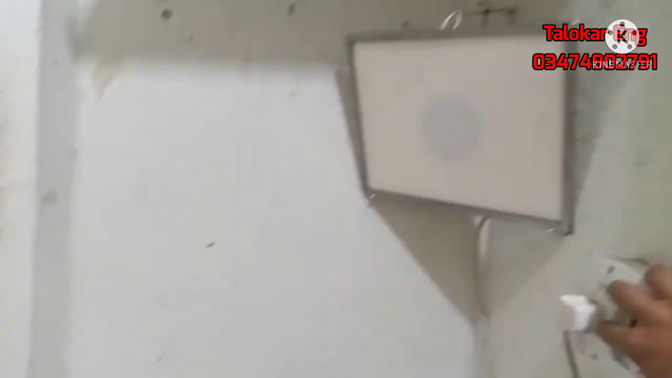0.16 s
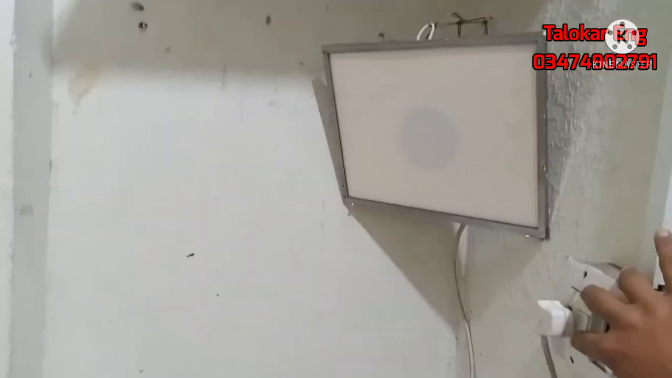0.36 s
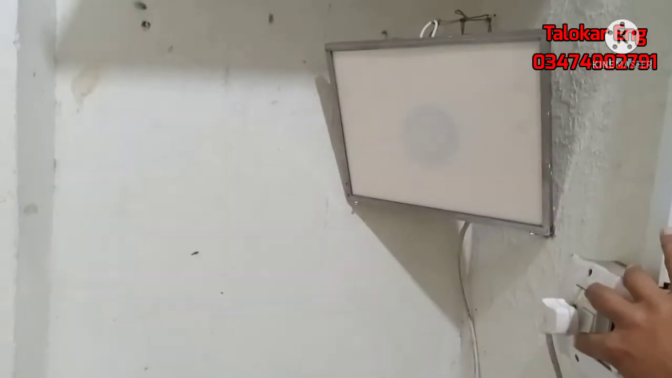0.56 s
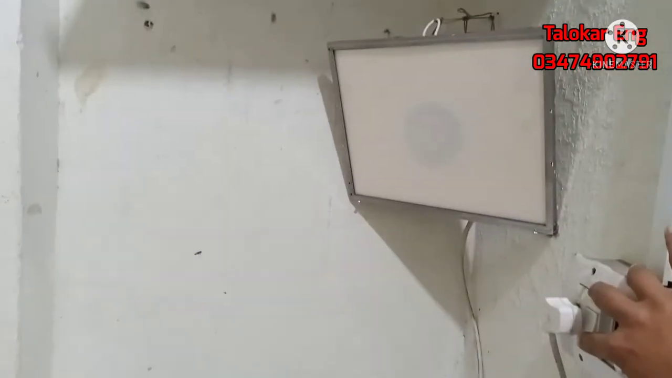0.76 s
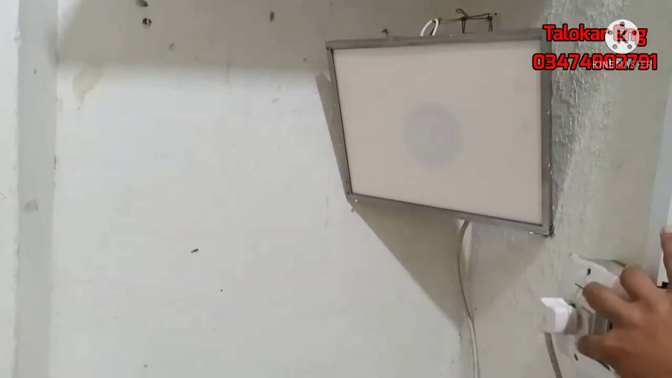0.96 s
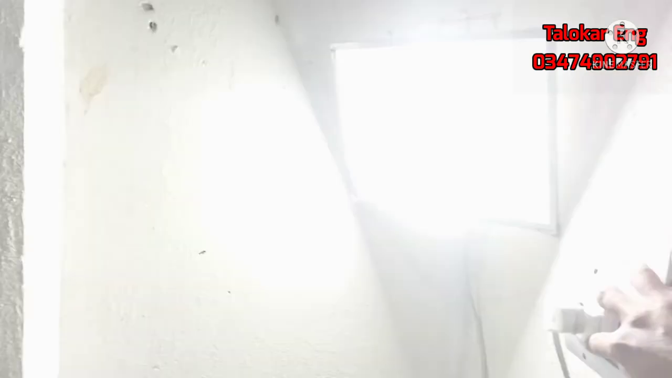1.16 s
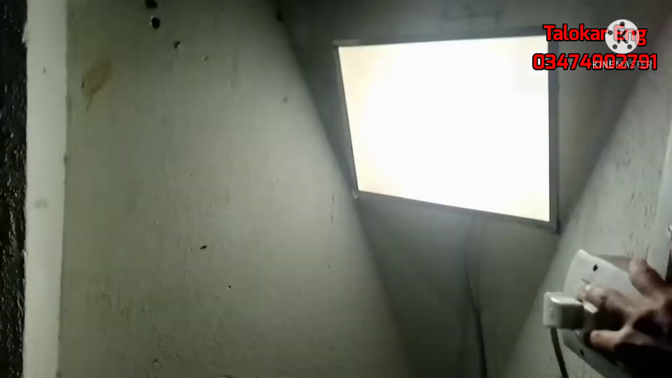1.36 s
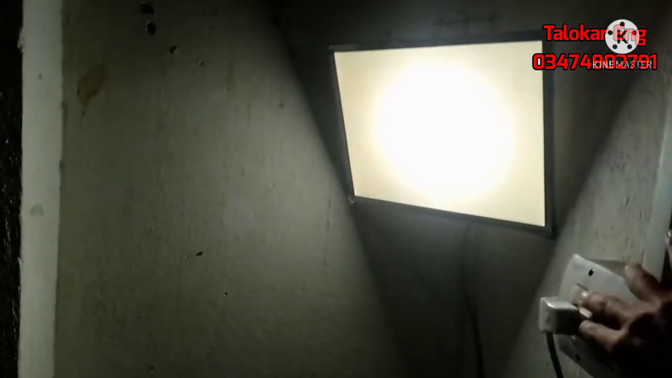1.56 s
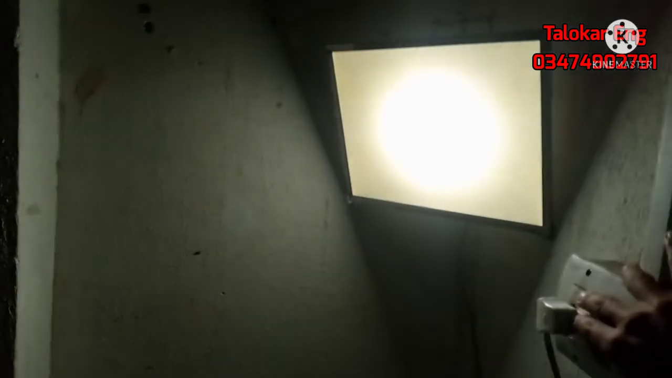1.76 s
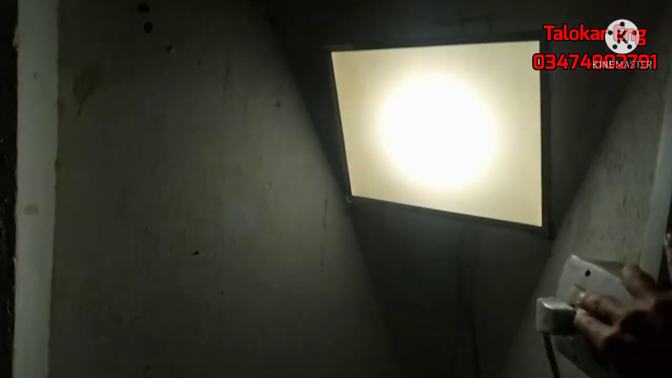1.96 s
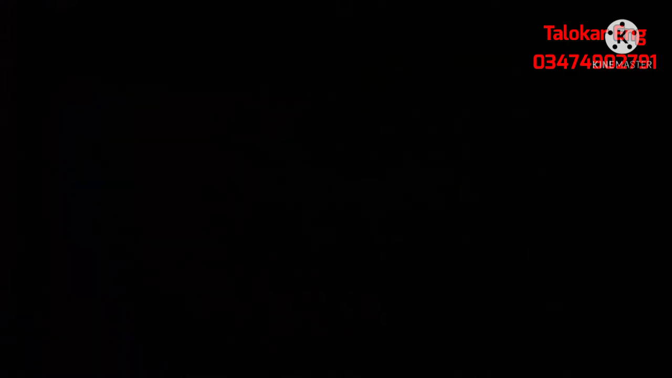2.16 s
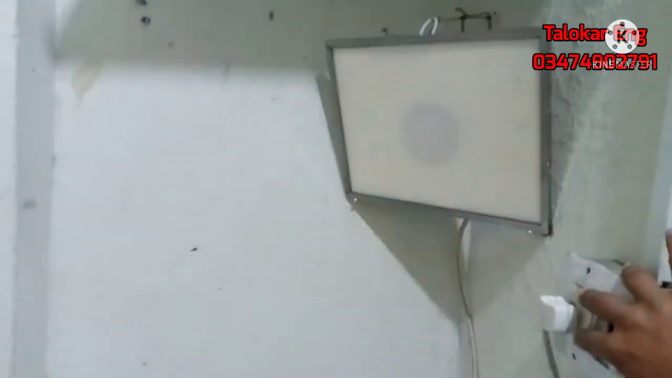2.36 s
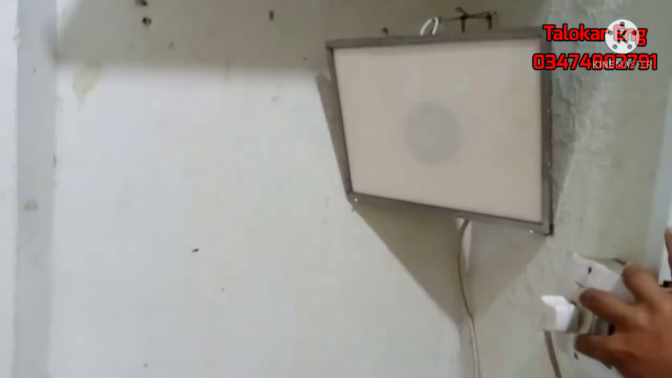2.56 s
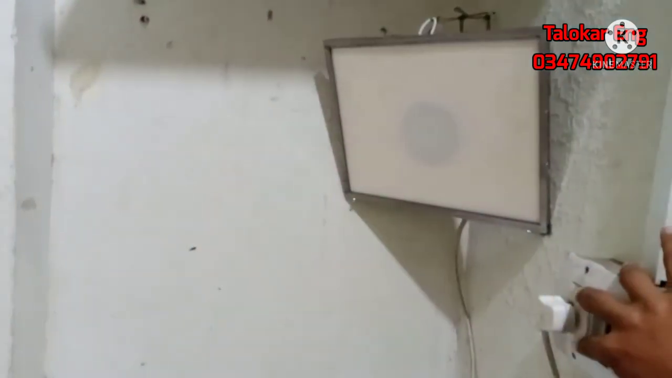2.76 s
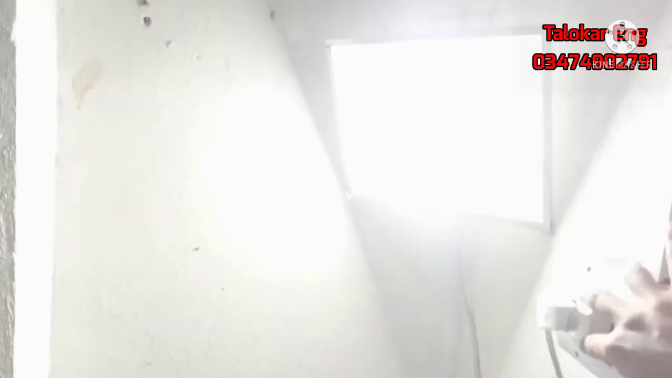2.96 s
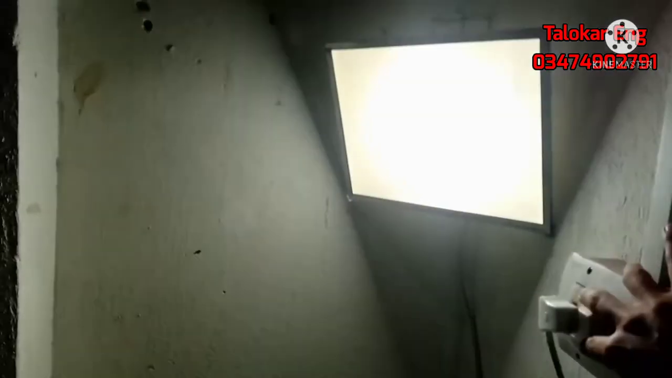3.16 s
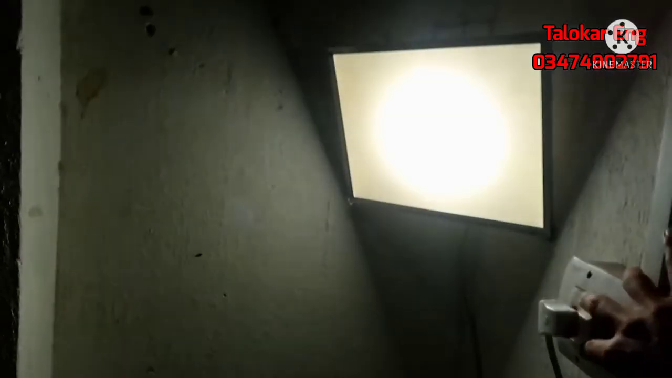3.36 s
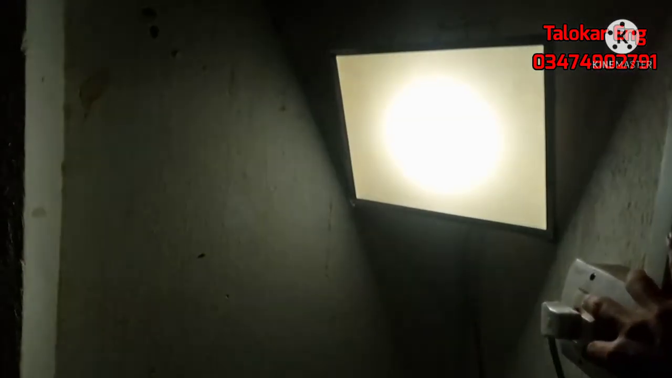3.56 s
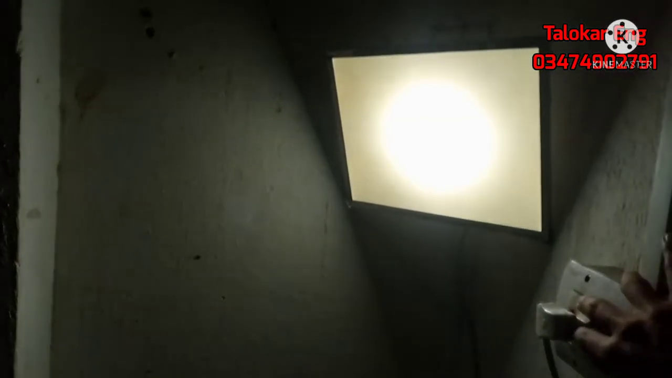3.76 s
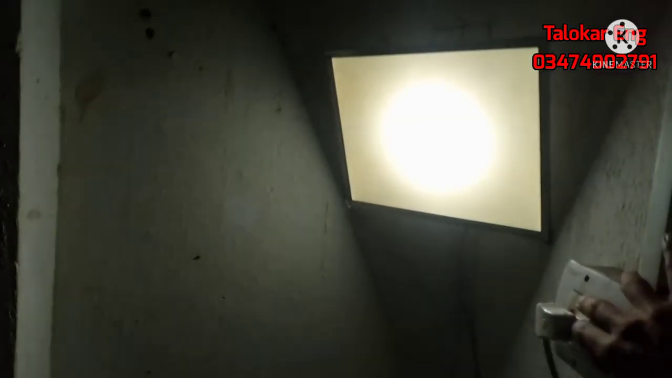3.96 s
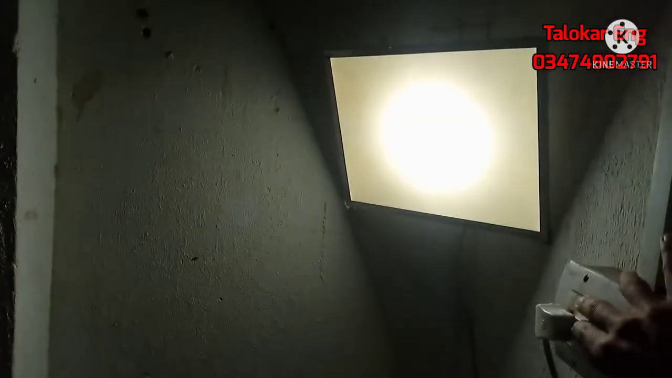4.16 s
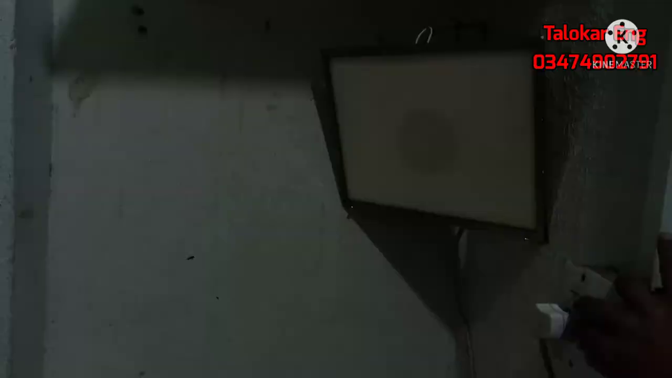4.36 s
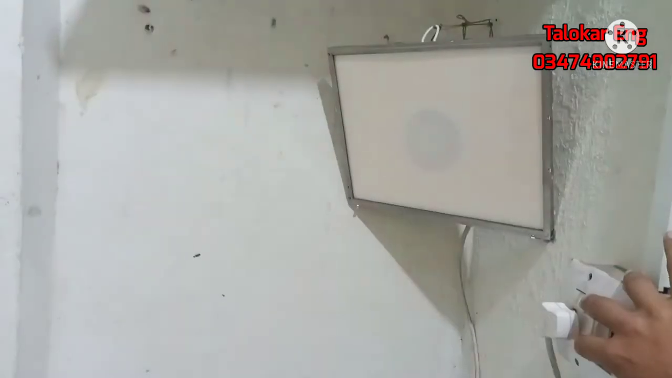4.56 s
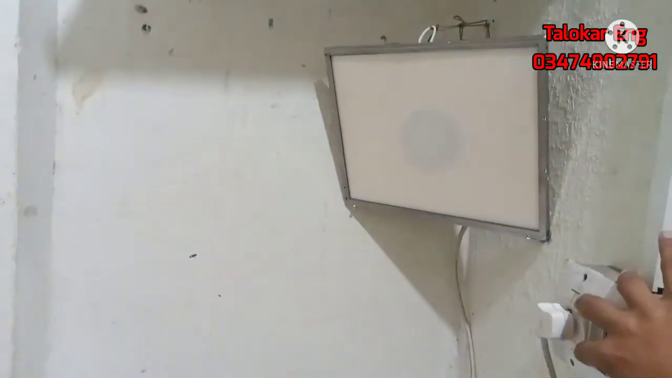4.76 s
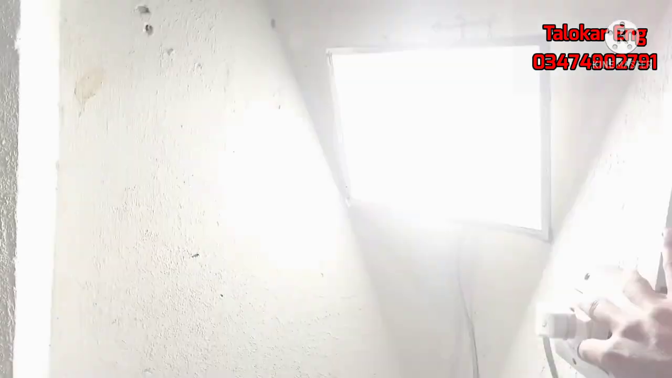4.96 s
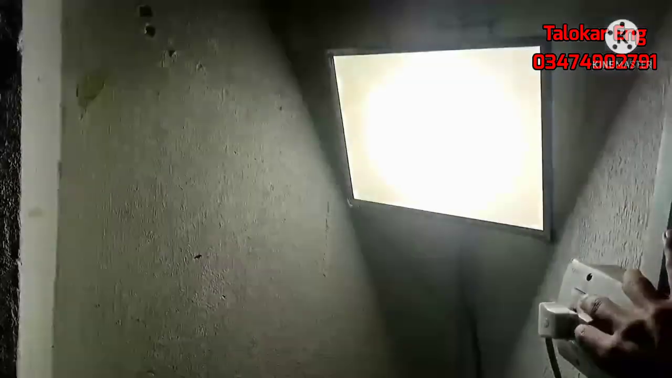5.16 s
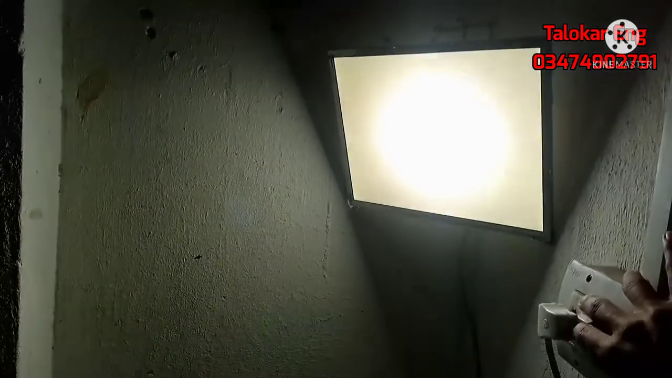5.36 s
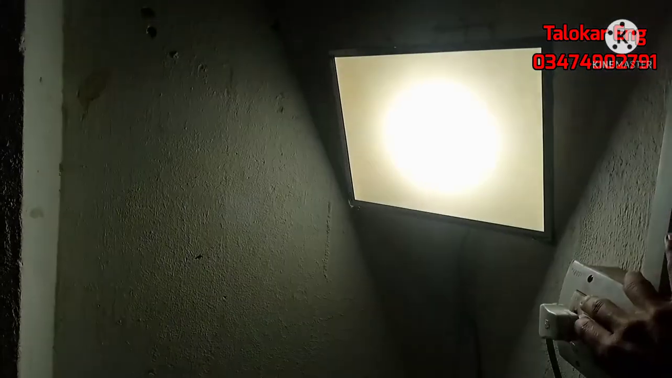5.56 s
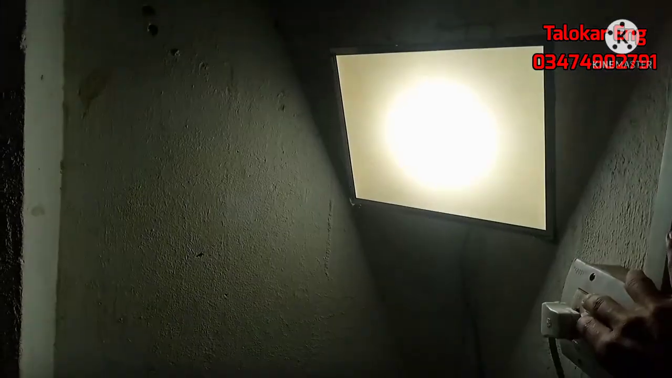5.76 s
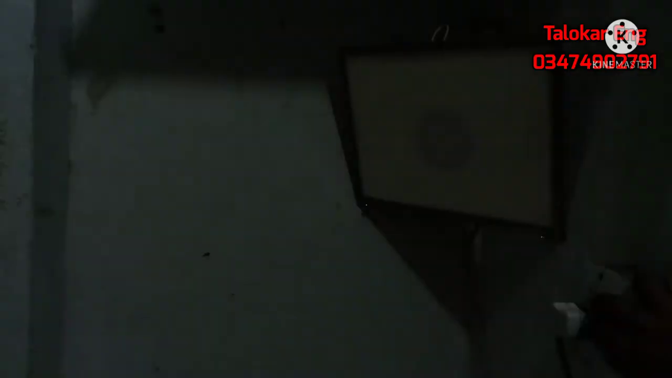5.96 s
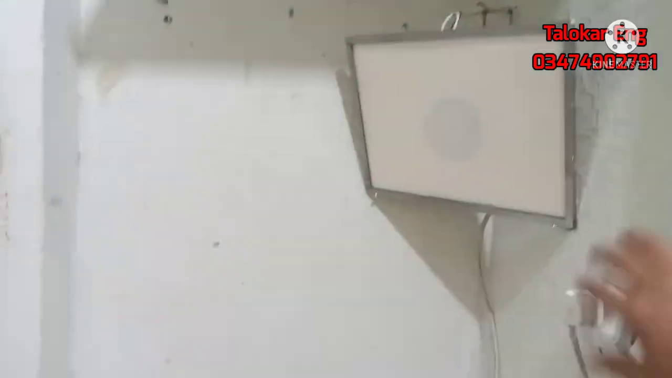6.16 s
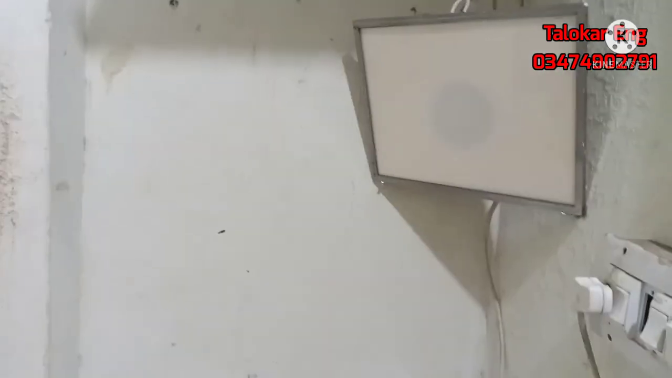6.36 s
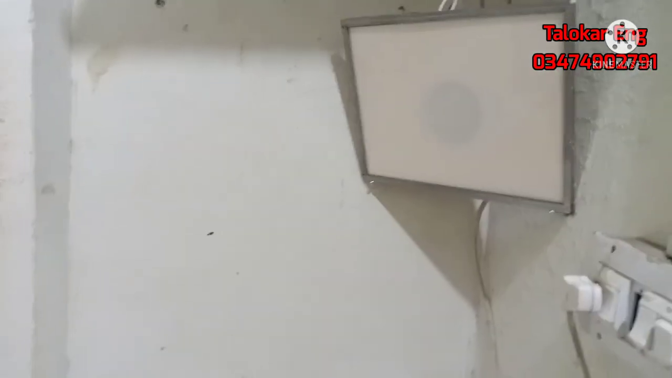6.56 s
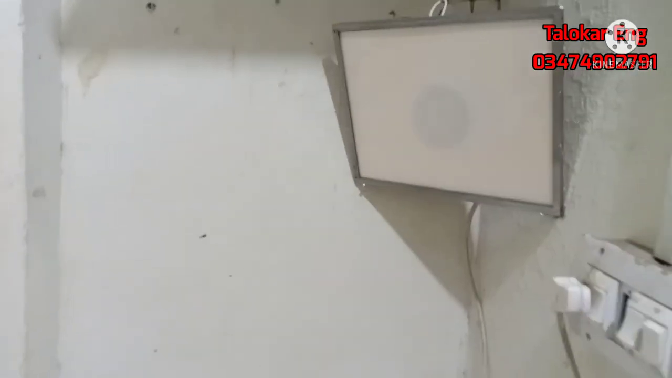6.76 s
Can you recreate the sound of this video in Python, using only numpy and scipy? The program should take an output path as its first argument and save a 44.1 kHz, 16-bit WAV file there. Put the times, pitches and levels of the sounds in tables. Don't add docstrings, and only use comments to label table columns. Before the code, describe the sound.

Tiny skin ticks and a soft tap open the scene, then a wall switch clicks sharply on, off, on, off, on, off. The snaps are dry, loud and plasticky, answered by nearby hard walls. Distant rumble, barely audible squeaks and soft microphone hiss lie beneath. After the last click come a few finger taps and a brief rub of cloth, then quiet.

```python
import sys
import numpy as np
from scipy import signal
from scipy.fft import rfft, irfft, next_fast_len
from scipy.io import wavfile
from scipy.ndimage import uniform_filter1d

SR = 44100
rng = np.random.default_rng(int(sys.argv[2]) if len(sys.argv) > 2 else 0)


def bounce(signal):
    frames = np.transpose(np.atleast_2d(signal))
    limited = np.clip(frames, -1, 1)
    pcm = np.round(limited * 32767).astype(np.int16)
    wavfile.write(sys.argv[1], SR, pcm)


def voltage_ratio(level):
    return 10 ** (np.asarray(level, float) / 20)


N = 299439

# (time [s], chatter level [dB], plate note [Hz], note level [dB])
ON_SNAPS = [
    (1.1097, -8.5, 1770, -25),
    (2.9148, -12, 2260, -21.5),
    (4.9111, -9, 3650, -25),
]
OFF_SNAPS = [
    (2.1785, -16, 1620, -19),
    (4.3273, -11, 1285, -22),
    (5.9342, -10, 840, -29.5),
]
# (frequency [Hz], level [dB per Hz])
ON_COLOUR = [(150, -57.5), (300, -22), (600, -8.5), (1100, -10), (1700, -1.5), (2500, -7), (3700, -4),
             (6400, -15.5), (7400, -21.5), (10500, -38), (13500, -48.5), (15000, -31.5), (16600, -38.5)]
OFF_COLOUR = [(150, -71), (300, -20.5), (550, -3.5), (1100, -9), (1900, -1.5), (2900, -4.5), (4600, -5),
              (6000, -1), (7400, -15), (10500, -27), (13500, -40.5), (15000, -16.5), (16600, -33)]
# (delay [s], level [dB])
ON_BOUNCES = [(.001, 0), (.002, -4), (.0046, -5), (.006, -4)]
OFF_BOUNCES = [(.0012, 1), (.0026, 7.5), (.0046, 0), (.006, -2.5)]
# (frequency [Hz], level [dB], t60 [s])
ON_PLATE = [(593, -37, 0.049), (1714, -29.5, 0.046), (2108, -25.5, .04), (3050, -26, 0.011),
            (3480, -30.5, 0.055), (3920, -25.5, 0.036), (4440, -23, 0.0074), (5300, -26, .03),
            (6220, -26.5, 0.022),
            (3600, -4, .005)]
OFF_PLATE = [(846, -17, 0.018), (1280, -26, .03), (1492, -37, 0.22), (2300, -46, .025), (3610, -22, 0.025),
             (4320, -36, 0.18), (5300, -20.5, 0.014), (5802, -23, 0.022), (6440, -20.5, 0.009)]
# (frequency [Hz], level [dB])
ON_CAVITIES = [(1600, -24), (2080, -18), (3560, -20), (3900, -24)]
OFF_CAVITIES = [(1290, -26), (2150, -26), (5500, -21.5), (5950, -20)]
# (delay [s], level [dB])
WALLS = [(.013, -17), (0.02, -12), (.024, -14.5), (0.034, -14.5)]
# (frequency [Hz], t60 [s])
ROOM_T60 = [(300, 0.35), (700, 0.26), (1200, 0.24), (1600, 0.28), (2050, 0.29), (2700, 0.28), (3600, 0.23),
            (4500, 0.3), (5600, 0.28), (7500, 0.27), (11000, 0.29), (13000, 0.32), (15000, 0.22)]
# (frequency [Hz], loss [dB per s squared])
TREBLE_SOAK = [(3000, -1), (7000, 150.5), (12000, 551), (14500, 60)]

# (time [s], peak [dB], hollow note [Hz], crack level [dB], thud level [dB])
TAPS = [(.124, -34, 1386, -32, -26), (1.55, -29, 1280, -35.5, -22), (1.635, -44, 1206, -26, 2.5),
        (2.382, -26.5, 1387, -22.5, -35), (2.858, -52, 593, -23.5, -15), (3.695, -48, 636, -23.5, -20),
        (4.688, -49.5, 1403, -31.5, -6), (5.694, -62, 620, -28.5, -12), (5.8, -55, 1290, -36, 0),
        (5.839, -34, 1306, -28, -27), (6.217, -32.5, 1380, -16, -8), (6.231, -18.5, 1346, -25, -9),
        (6.27, -30, 733, -27, -6), (6.499, -52, 2280, -30, -10)]
# (frequency [Hz], level [dB], t60 [s])
WALL_BOX = [(393, -20, 0.27), (506, -4.5, 0.039), (850, 1, 0.019), (1127, -5, 0.021)]
# (frequency [Hz], level [dB], t60 [s])
CREAK = [(985, -41, .075), (1040, -48, .05)]
# (time [s], peak [dB])
TICKS = [(.06, -72), (.165, -74), (.212, -55), (0.247, -60), (.26, -67), (.276, -70), (0.318, -56),
         (0.357, -60), (0.417, -55.5), (0.509, -66.5), (0.64, -60.5), (0.649, -61), (0.969, -63),
         (1.039, -54.5), (1.491, -76.5), (6.308, -46)]
# (frequency [Hz], level [dB per Hz])
TICK_COLOUR = [(1200, -41.5), (2200, -13.5), (4400, -12), (5500, -4.5), (6800, -1.5), (7800, -10),
               (11300, -26), (13500, -28), (15000, -19), (16000, -18.5)]
RUB_COLOUR = [(160, -31), (280, -7), (355, -5), (610, -17.5), (1140, -8.5), (1700, -6.5), (3000, -8.5),
              (4600, -8.5), (6500, -5), (7700, -13), (10000, -26), (13300, -36), (15000, -21), (16000, -20)]
# (time [s], rise [s], hold [s], level [dB])
SLIDES = [(-.02, 0.012, 0.011, -60), (.045, 0.019, 0.015, -78), (1.545, .009, .006, -92),
          (1.628, .008, .03, -78), (6.165, 0.022, .006, -55)]
PEELS = [
    (.1, 0.057, 0.017, -70),
    (.2, 0.013, .21, -71),
]
SWEEPS = [
    (6.2, 0.2, .012, -51),
    (6.44, .11, 0.037, -55),
]

# (time [s], length [s], frequency [Hz], level [dB])
SQUEAKS = [(0.011, 0.041, 882, -71), (1.045, 0.059, 1970, -75), (1.724, 0.071, 3660, -82),
           (2.648, 0.12, 2420, -81.5), (2.856, 0.03, 3050, -71), (3.691, 0.1, 1420, -79.5),
           (3.817, 0.113, 3640, -82), (3.829, 0.052, 1620, -82), (3.865, 0.15, 2360, -77.5),
           (4.133, 0.029, 2420, -78.5), (4.176, 0.048, 1620, -76.5), (6.187, 0.025, 5100, -58),
           (4.639, 0.046, 3270, -75)]
# (frequency [Hz], level [dB per Hz])
RUMBLE_COLOUR = [(12, -49.5), (20, -29.5), (27, -32.5), (28, -29.5), (35, -11), (49, -8.5), (65, 3.5),
                 (86, -7.5), (112, 5), (125, -2), (145, -12), (173, -10), (204, -5), (238, -19),
                 (330, -27.5), (430, -58.5), (730, -120)]
HISS_COLOUR = [(160, -26), (280, -5.5), (500, -8), (700, -13.5), (1100, -15.5), (2000, -19.5),
               (4500, -23.5), (7000, -26.5), (7900, -35.5), (10000, -37), (13500, -42), (15000, -27),
               (16000, -28)]
# (time [s], rise [s], hold [s], level [dB])
SWELLS = [
    (-.1, 0.082, 0.024, -69),
    (4.9, 0.063, 0.029, -46.5),
    (6.15, .1, 0.13, -58),
]
DRONE = [
    (6.2, .15, .17, -50),
]

SLIDE_FALL, PEEL_FALL, SWEEP_FALL, SWELL_FALL = 180, 330, 40.4, 130


def rocker(snaps, blow_db, tilt_db, colour, bounces, modes, cavities, wet_db):
    out, t = np.zeros(N), np.arange(512) / SR
    for s, chatter_db, note_hz, note_db in snaps:
        bursts = sum(voltage_ratio(size_db) * np.exp(-((t - lag) / 0.00065) ** 2) for lag, size_db in bounces)
        grit = 1.3 * np.gradient(uniform_filter1d(rng.standard_normal(512), size=2))
        settling = np.clip((.011 - t) / 0.0038, 0, 1) * (t > .0005)
        blows = voltage_ratio(chatter_db - 11) * (bursts + 0.75) * grit * settling
        blows[0] = -1
        plate = ring(modes + [(note_hz, note_db, .03)], rise=0.00049)
        body = np.pad(impulse(colour, tilt_db), (0, 1024)) + plate
        snap = np.convolve(blows, body)
        add(out, s, voltage_ratio(blow_db) * snap)
        for lag, echo_db in WALLS:
            add(out, s + lag, voltage_ratio(blow_db + echo_db) * snap)
        add(out, s, voltage_ratio(blow_db + wet_db) * room(body))
        add(out, s, voltage_ratio(blow_db - 13.5) * linger(cavities))
    return out


def impulse(spectrum, tilt_db=0):
    hz = np.fft.rfftfreq(2048, 1 / SR)
    level_db = along(spectrum, hz) + tilt_db * np.log2((hz + 1) / 3000)
    ceps = irfft(np.log(voltage_ratio(level_db) + 1e-6))
    ceps = np.r_[ceps[0], 2 * ceps[1:1024], np.zeros(1024)]
    pulse = irfft(np.exp(rfft(ceps)))[:1024]
    return pulse / np.abs(pulse).max()


def ring(modes, rise):
    t = np.arange(2048) / SR
    waves = 0
    for hz, db, t60 in modes:
        waves = waves + voltage_ratio(db + rng.normal(0, 0.5) - 60 * t / t60) * np.sin(2 * np.pi * hz * t)
    return waves * (1 - np.exp(-t / rise)) ** 2


def linger(modes):
    t = np.arange(SR // 2) / SR
    t60_s, width_hz = .37, 250

    def sway():
        return np.interp(t * width_hz, np.arange(200), rng.standard_normal(200))

    notes = 0
    for hz, db in modes:
        phase = 2 * np.pi * hz * t
        notes = notes + voltage_ratio(db) * (sway() * np.sin(phase) + sway() * np.cos(phase))
    return notes * voltage_ratio(-60 * t / t60_s) * (1 - np.exp(-t / .008))


def room(x):
    hz, t, z = signal.stft(rng.standard_normal(SR // 2), SR, nperseg=256)
    decay_db = -60 * t / along(ROOM_T60, hz)[:, None] - t ** 2 * along(TREBLE_SOAK, hz)[:, None]
    tail = signal.istft(z * voltage_ratio(decay_db), SR, nperseg=256)[1][:SR // 2]
    tail = tail * np.clip(np.arange(SR // 2) / SR / 0.012 - .35, 0, 1)
    return signal.fftconvolve(x, tail / np.linalg.norm(tail))


def in_room(x, wet_db):
    out = voltage_ratio(wet_db) * room(x)
    return out + np.pad(x, (0, len(out) - len(x)))


def finger():
    return taps() + creak() + ticks() + rubbing()


def taps():
    out, t = np.zeros(N), np.arange(1025) / SR
    for s, db, hz, crack_db, thud_db in TAPS:
        plate = [(hz, 0, .02), (1.12 * hz, -6, .015), (900, -5, .02), (1650, -8, .012),
                 (2050, -12, .015), (2860, -18, .015)]
        knock = ring(plate, rise=0.0025) + voltage_ratio(thud_db) * ring(WALL_BOX, rise=0.0035)
        scuff = voltage_ratio(-60 * t / 0.045) * (1 - np.exp(-t / 0.0009)) * rng.standard_normal(1025)
        crack = voltage_ratio(crack_db) * np.convolve(scuff, impulse(RUB_COLOUR, tilt_db=-3.0))
        knock = in_room(knock, wet_db=-8.5)
        add(out, s, voltage_ratio(db) * knock_and_crack(knock, in_room(crack, wet_db=-3.5)))
    return out


def knock_and_crack(knock, crack):
    both = np.zeros(max(len(knock), len(crack)))
    both[:len(knock)] += knock
    both[:len(crack)] += crack
    return both


def creak():
    out = np.zeros(N)
    add(out, 6.184, in_room(ring(CREAK, rise=.002), wet_db=-10))
    return out


def ticks():
    out, t = np.zeros(N), np.arange(1025) / SR
    for s, db in TICKS:
        snap = np.convolve(voltage_ratio(-60 * t / 0.0089) * rng.standard_normal(1025), impulse(TICK_COLOUR))
        add(out, s, voltage_ratio(db - 5.5) * in_room(snap, wet_db=-8))
    return out


def rubbing():
    peeling = strokes(PEELS, PEEL_FALL) * noise(TICK_COLOUR, patchy_db=2.5)
    sliding = strokes(SLIDES, SLIDE_FALL) + strokes(SWEEPS, SWEEP_FALL)
    return peeling + sliding * noise(RUB_COLOUR, patchy_db=0.8)


def strokes(rows, fall):
    t = np.arange(N) / SR
    gain = np.zeros(N)
    for s, rise, hold, db in rows:
        release_db = fall * np.clip(t - s - rise - hold, 0, None)
        gain += voltage_ratio(db - release_db) * np.clip((t - s) / rise, 0, 1) ** 2
    return gain


def squeaks():
    out = np.zeros(N)
    for s, length, hz, db in SQUEAKS:
        t = np.arange(round(length * SR)) / SR
        waver_hz = .022 * hz * np.interp(t * 60, np.arange(20), rng.standard_normal(20))
        flutter = .9 + .7 * np.interp(t * 90, np.arange(30), rng.standard_normal(30))
        swell = np.sin(np.pi * t / length) ** .6
        whistle = np.sin(2 * np.pi * np.cumsum(hz + waver_hz) / SR)
        add(out, s, voltage_ratio(db + 5.0) * flutter * swell * whistle)
    return out


def far_rumble():
    level = np.hypot(voltage_ratio(-55), strokes(SWELLS, SWELL_FALL))
    drone = strokes(DRONE, PEEL_FALL) * np.sin(2 * np.pi * 114 * np.arange(N) / SR)
    return level * noise(RUMBLE_COLOUR, patchy_db=2.0) + drone


def hiss():
    return voltage_ratio(-72.5) * noise(HISS_COLOUR, patchy_db=3.0)


def noise(spectrum, patchy_db):
    hz, _, z = signal.stft(rng.standard_normal(N + SR), SR, nperseg=4096)
    coloured = signal.istft(z * voltage_ratio(along(spectrum, hz))[:, None], SR, nperseg=4096)[1]
    z = signal.stft(coloured, nperseg=512)[2]
    field = uniform_filter1d(rng.standard_normal(z.shape), size=6, axis=0)
    field = uniform_filter1d(field, size=10, axis=1)
    return unit(signal.istft(z * voltage_ratio(patchy_db * unit(field)), nperseg=512)[1][:N])


def unit(x):
    return x / np.sqrt(np.mean(x ** 2) + 1e-20)


def along(points, hz):
    f, v = np.transpose(points)
    return np.interp(np.log(hz + 1), np.log(f + 1), v)


def add(track, s, x):
    spot = track[round(s * SR):][:len(x)]
    spot += x[:len(spot)]


def scene():
    switch = rocker(ON_SNAPS, 4.42, 1.7, ON_COLOUR, ON_BOUNCES, ON_PLATE, ON_CAVITIES, wet_db=2.5)
    switch += rocker(OFF_SNAPS, 3.5, 1.55, OFF_COLOUR, OFF_BOUNCES, OFF_PLATE, OFF_CAVITIES, wet_db=4.5)
    return (switch + finger() + squeaks() + far_rumble() + hiss())[None]


def low_pass(x):
    return signal.sosfilt(signal.butter(12, 16670, fs=SR, output="sos"), x)


def record(dry):
    width = round(.03 * SR)
    power = signal.fftconvolve(dry ** 2, np.ones((1, width)) / width)
    power = np.abs(power)[:, round(.003 * SR):][:, :N]
    over_db = np.clip(10 * np.log10(power + 1e-12) + 31, 0, None)
    bass = signal.sosfiltfilt(signal.butter(2, 260, fs=SR, output="sos"), dry)
    squeezed = (dry - bass) * voltage_ratio(-.7 * over_db) + bass * voltage_ratio(-.35 * over_db)
    m = next_fast_len(N + SR)
    hz = np.fft.rfftfreq(m, 1 / SR)
    split = 1 + voltage_ratio(-8.5) / (1 + ((hz - 6750) / 45) ** 2)
    shelf = voltage_ratio(-24) + 1 / (1 + (hz / 15600) ** 300)
    bass_cut = 1 / (1 + (43 / (hz + 1)) ** 4)
    response = split * shelf * bass_cut * (hz < 16600)
    return low_pass(irfft(rfft(squeezed, m) * response, m)[:, :N])


dry = scene()
out = record(dry)
bounce(out)
```